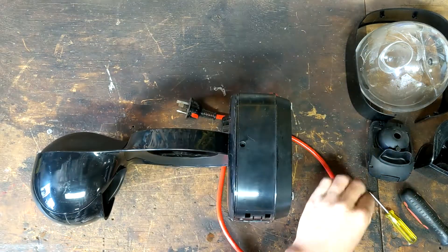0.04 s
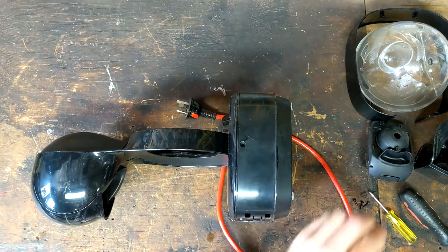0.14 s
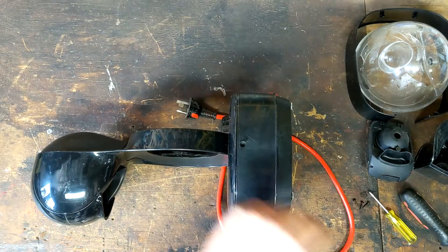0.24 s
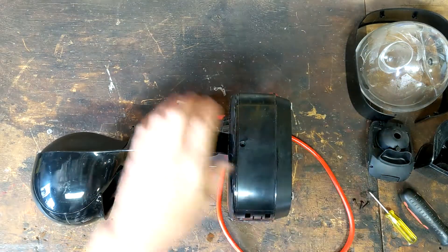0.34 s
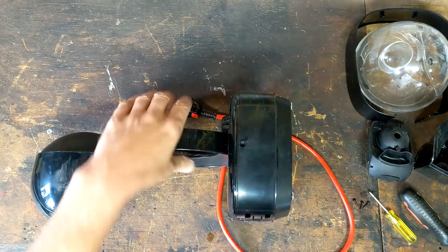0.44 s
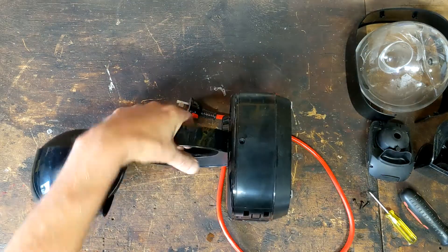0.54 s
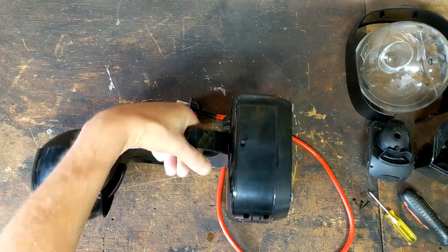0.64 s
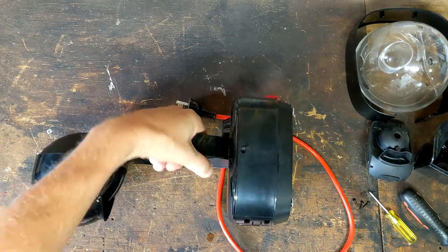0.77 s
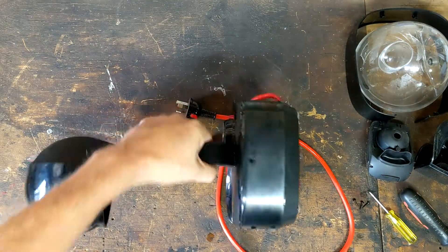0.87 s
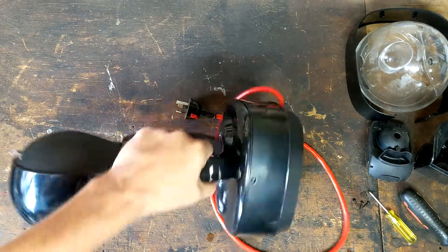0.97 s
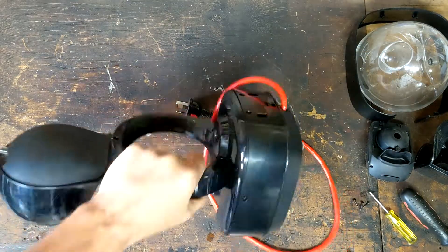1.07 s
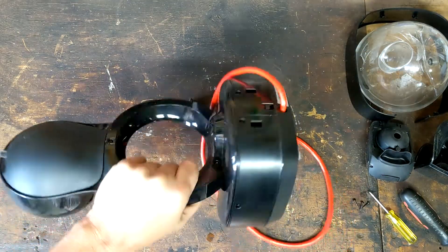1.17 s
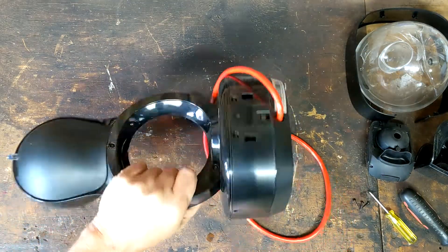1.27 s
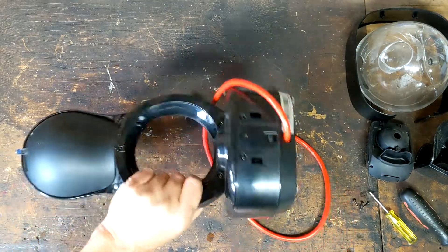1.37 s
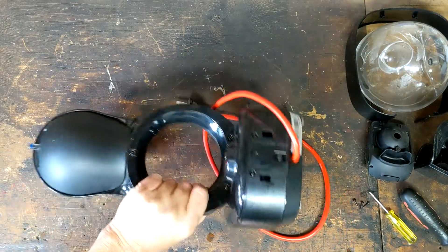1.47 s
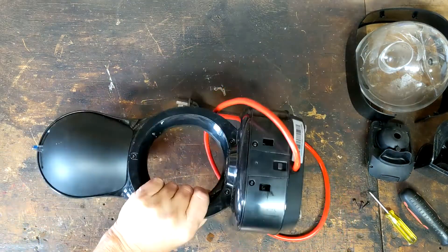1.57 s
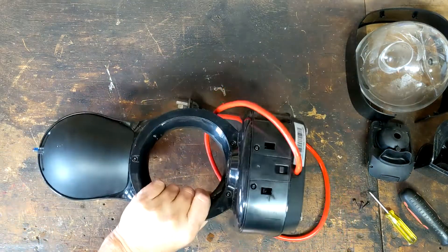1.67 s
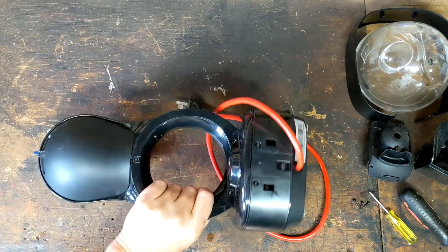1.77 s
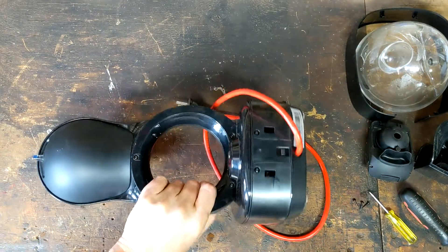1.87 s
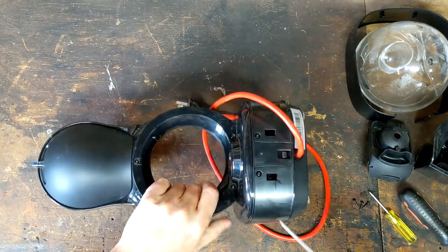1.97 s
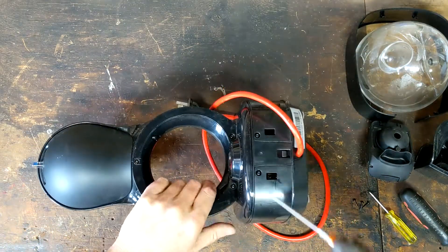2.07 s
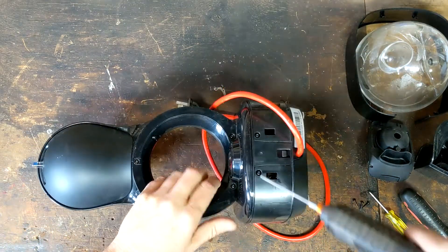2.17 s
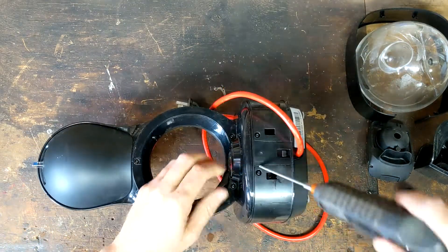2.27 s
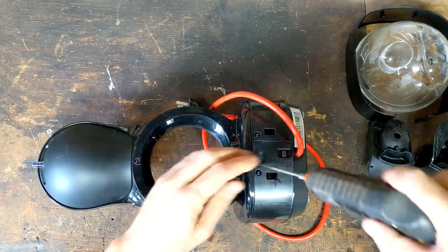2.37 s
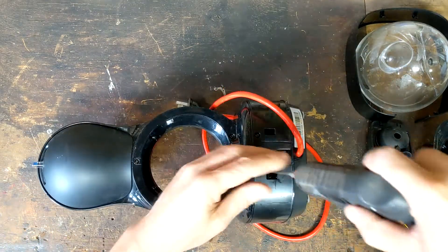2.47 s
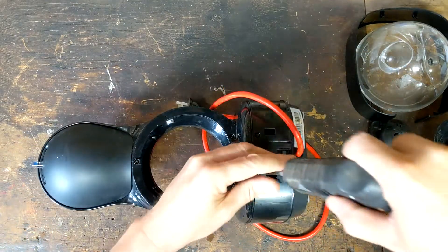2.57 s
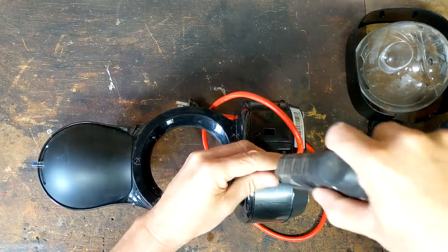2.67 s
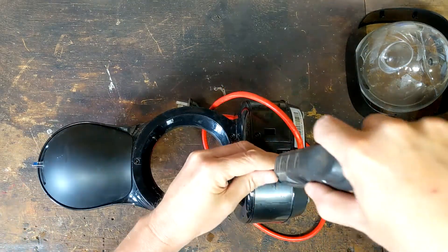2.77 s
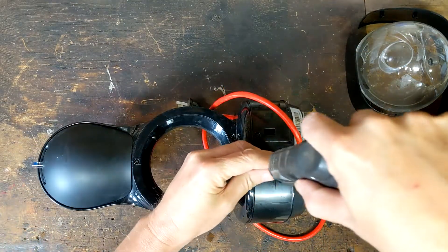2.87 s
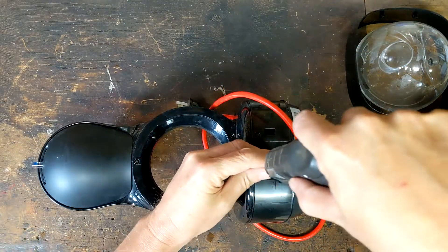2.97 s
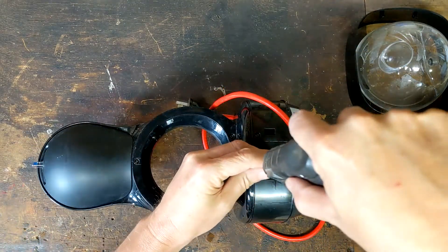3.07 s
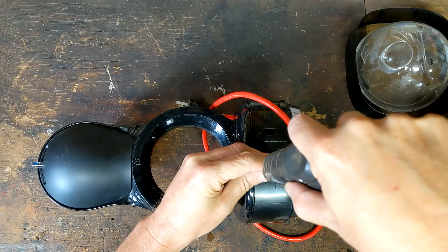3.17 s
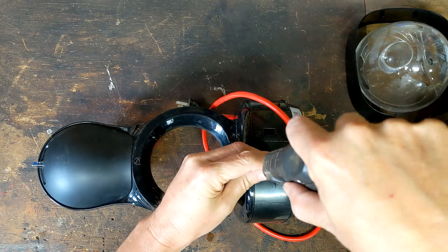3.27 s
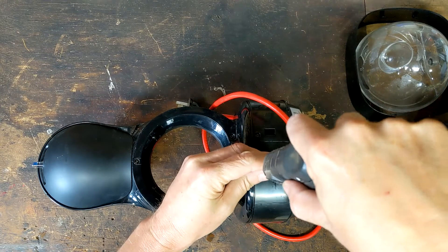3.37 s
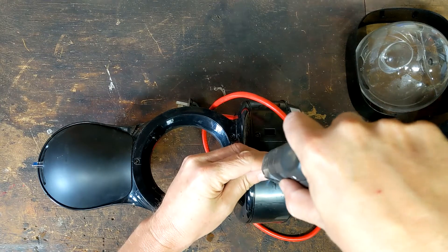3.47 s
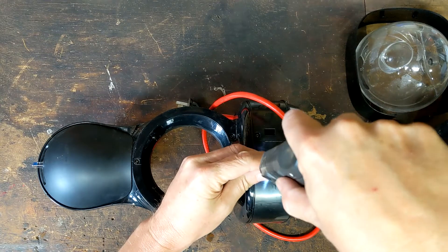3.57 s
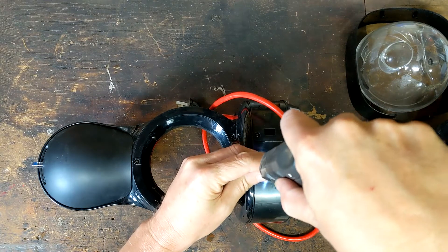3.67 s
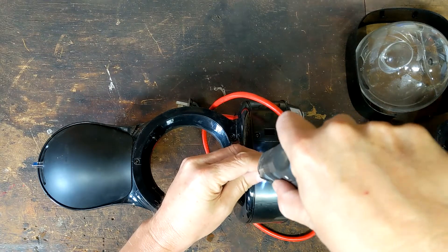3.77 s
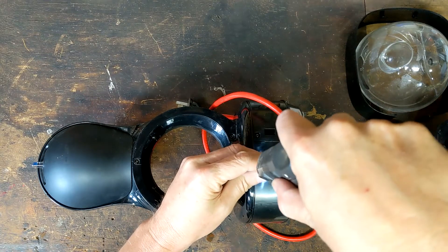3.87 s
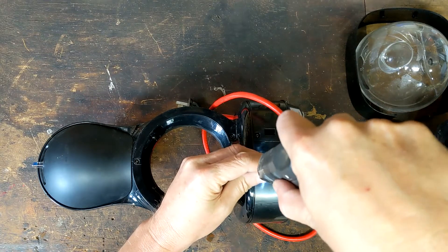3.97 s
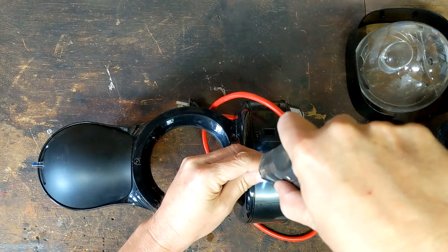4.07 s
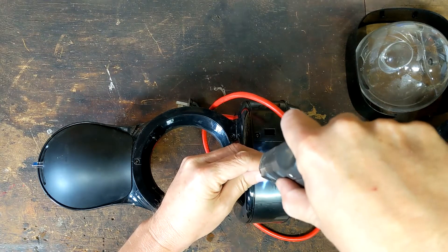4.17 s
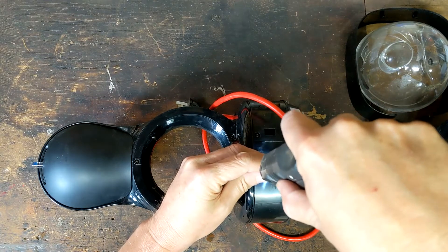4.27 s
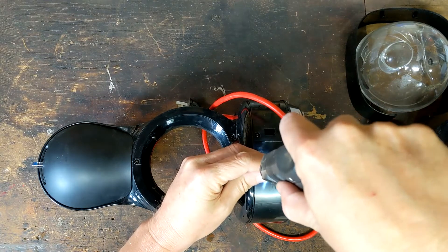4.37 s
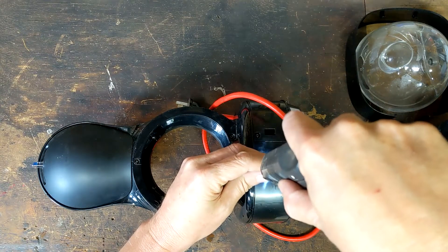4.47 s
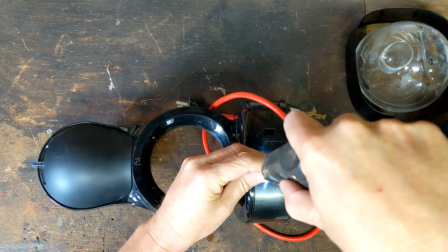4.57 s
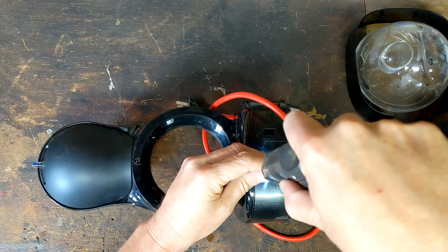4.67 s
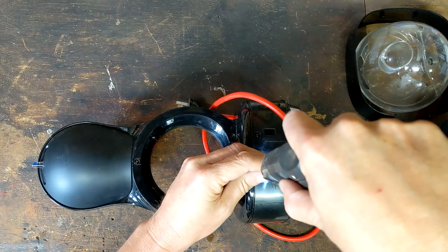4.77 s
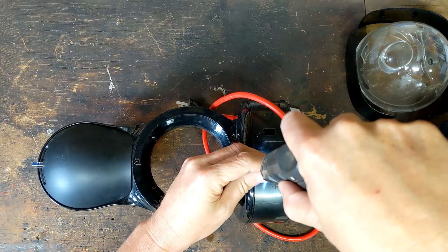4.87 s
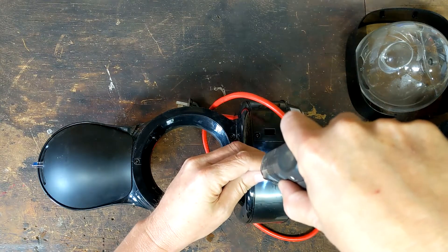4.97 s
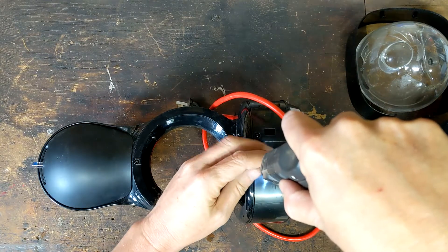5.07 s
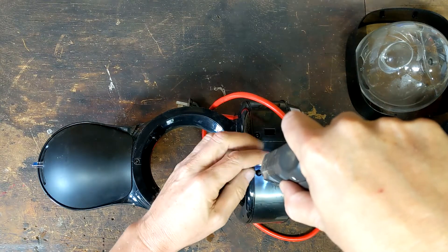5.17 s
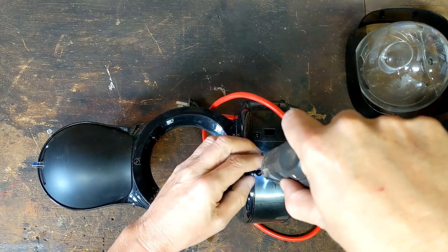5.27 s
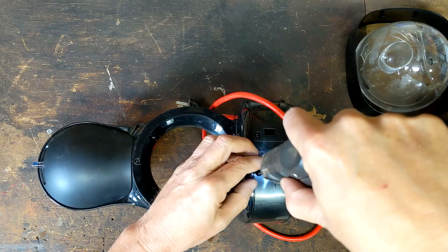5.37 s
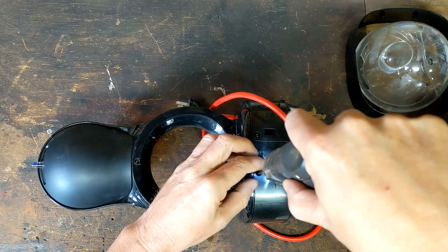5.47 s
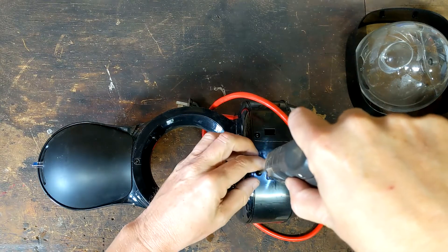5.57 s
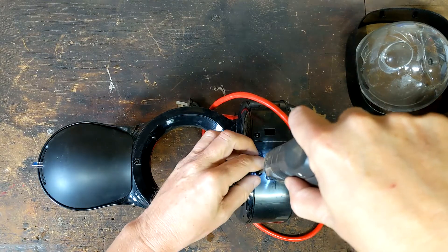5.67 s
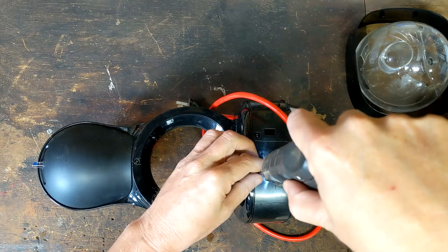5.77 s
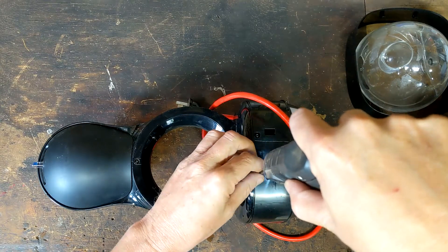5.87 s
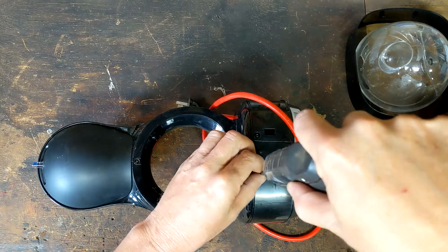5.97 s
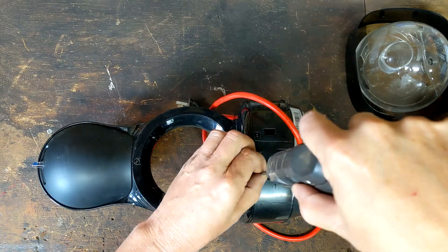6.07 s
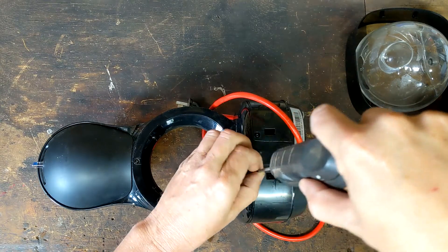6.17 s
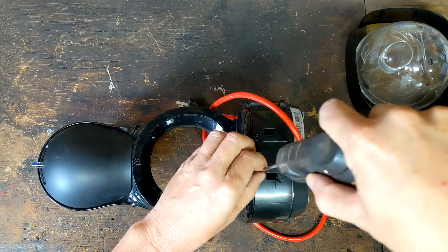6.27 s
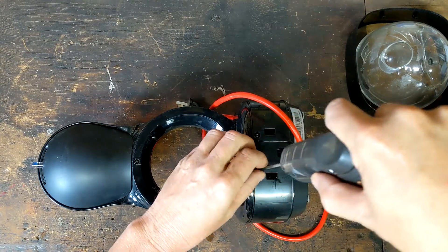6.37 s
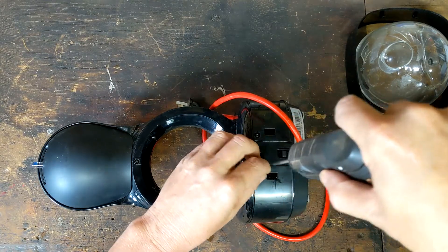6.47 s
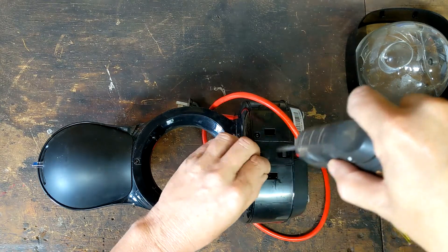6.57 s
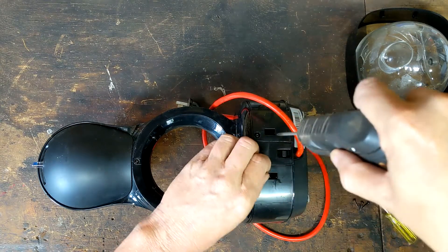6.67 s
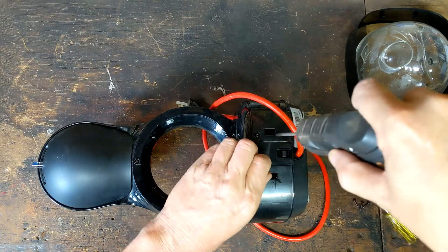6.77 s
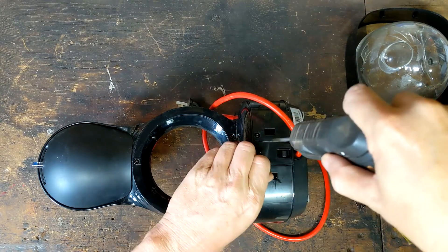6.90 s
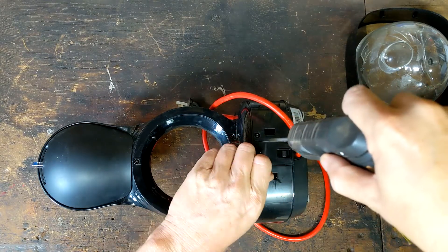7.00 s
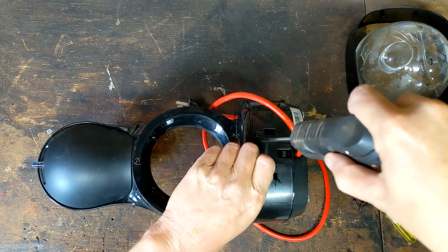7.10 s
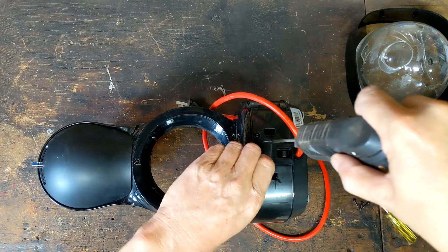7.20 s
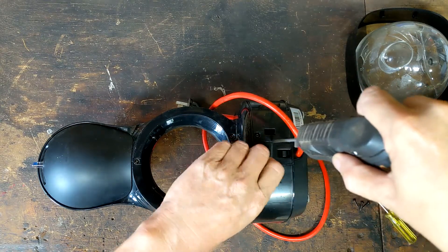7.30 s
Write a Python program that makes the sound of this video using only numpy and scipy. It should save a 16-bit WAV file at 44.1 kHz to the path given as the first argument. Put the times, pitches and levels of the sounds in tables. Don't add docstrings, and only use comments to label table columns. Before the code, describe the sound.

A plastic housing thuds onto a wooden bench, a tool bit ticks at a screw, then a small geared motor whines, rattles and coasts down.

```python
import sys
import numpy as np
from scipy import signal
from scipy.fft import rfft, irfft, next_fast_len
from scipy.io import wavfile
from scipy.ndimage import uniform_filter1d

SR = 44100
rng = np.random.default_rng(int(sys.argv[2]) if len(sys.argv) > 2 else 0)


def volts_from_decibels(level):
    exponent = np.asarray(level, float) / 20
    return 10 ** exponent


def materialize(psi):
    bounded = np.clip(np.atleast_2d(psi).T, -1, 1)
    quanta = np.round(bounded * 32767).astype(np.int16)
    wavfile.write(sys.argv[1], SR, quanta)


N = 323694

# pitch_hz, level_db (per Hz)
CASING_COLOUR = [(120, -52), (200, 0), (500, -16), (749, -8.5), (933, -4.5), (1060, -7.5), (1650, -11.5),
                 (2420, -15), (3560, -9.5), (4950, -18.5), (5630, -18), (8270, -21), (9060, -19.5),
                 (13600, -29), (16000, -25)]
TRIGGER_S, RELEASE_S, MESH_HZ = 3.61, 5.95, 917


def evened(x):
    return x / np.sqrt(np.mean(x ** 2) + 1e-20)


def hiss():
    return rng.standard_normal((2, N))


def read(points, hz):
    f, value = np.transpose(points)
    return np.interp(np.log(hz + 1), np.log(f + 1), value)


def band(x, lo_hz, hi_hz, order=2):
    sos = signal.butter(order, [lo_hz, min(hi_hz, 20000)], "bandpass", fs=SR, output="sos")
    return signal.sosfilt(sos, x, axis=-1)


def colour(x, gain):
    size = next_fast_len(x.shape[-1])
    spectrum = rfft(x, size) * gain(np.fft.rfftfreq(size, 1 / SR))
    return irfft(spectrum, size)[..., :x.shape[-1]]


def drift(seconds):
    size = round(seconds * SR)
    return evened(uniform_filter1d(uniform_filter1d(rng.standard_normal(N), size), size))


def bumps(modes, hz):
    return volts_from_decibels(sum(db / (1 + (2 * (hz - f) / width) ** 2) for f, width, db in modes))


def ringing(modes, t):
    return sum(volts_from_decibels(db - 60 * t / t60) * np.sin(2 * np.pi * hz * t) for hz, db, t60 in modes)[None]


def air():
    # pitch_hz, level_db (per Hz)
    hush_colour = [(110, -10), (180, -8), (341, -2.5), (435, -6), (670, -11), (888, -9), (2110, -18.5),
                   (4720, -18), (5700, -21), (6620, -21), (9640, -20.5), (15100, -30), (16000, -19)]
    # pitch_hz, width_hz (or waver), level_db
    hum_lines = [
        (99.5, 14, -67),
        (347, 1.5, -70),
    ]
    hush = evened(colour(hiss(), lambda hz: volts_from_decibels(read(hush_colour, hz))))
    (low_hz, width_hz, low_db), (thin_hz, waver_hz, thin_db) = hum_lines
    hum = volts_from_decibels(low_db) * evened(band(hiss(), low_hz - width_hz / 2, low_hz + width_hz / 2))
    thin = np.sin(2 * np.pi * np.cumsum(thin_hz + waver_hz * drift(0.23)) / SR)
    return volts_from_decibels(-64.5 + 0.88 * drift(0.024)) * hush + hum + volts_from_decibels(thin_db + 1 + drift(0.039)) * thin


def bird():
    # start_s, level_db
    calls = [
        (.138, -73),
        (.33, -70),
        (.538, -68),
        (3.1, -72),
        (3.335, -69),
    ]
    # time_s, pitch_hz, level_db
    glide = [
        (0, 2980, -5),
        (.016, 3330, -1),
        (.034, 3050, -5),
        (.042, 3150, -14),
        (.062, 3300, -12),
        (.072, 3330, 0),
        (.098, 2850, -7),
    ]
    out, (s, hz, db) = np.zeros(N), np.transpose(glide)
    t = np.arange(0, s[-1], 1 / SR)
    whistle = np.sin(2 * np.pi * np.cumsum(np.interp(t, s, hz)) / SR)
    chirp = whistle * volts_from_decibels(np.interp(t, s, db)) * signal.windows.tukey(len(t), .15)
    for start_s, level_db in calls:
        flutter_db = 3 * evened(uniform_filter1d(rng.standard_normal(len(t)), 200))
        out[round(start_s * SR):][:len(t)] += volts_from_decibels(level_db + flutter_db) * chirp
    return out


def gusts():
    # peak_s, level_db, fall_db_per_s
    swells = [(.02, -70, 30), (.3, -64, 4), (.99, -50, 60), (1.74, -40, 92), (2.01, -47.5, 28),
              (2.5, -62.5, 2), (3.5, -53, 30), (4.93, -67, 31), (5.89, -54.5, 12), (6.258, -41, 22),
              (6.486, -40.5, 50), (6.76, -48, 25), (7.3, -59, 100)]
    # start_s, level_db, length_s
    puffs = [(3.524, -38, 0.015), (3.543, -41, 0.01), (5.909, -62, 0.0092), (6.25, -34, 0.0088),
             (6.31, -36, 0.0077), (6.37, -40, 0.0086), (6.404, -47, 0.013), (6.481, -52, 0.012),
             (6.508, -47, 0.01), (6.606, -49, 0.012), (6.753, -56, 0.012), (6.829, -41, 0.015),
             (6.888, -36.5, 0.01), (6.973, -44, 0.0096), (7.02, -49, 0.011), (7.297, -41.5, 0.0098)]
    calm_db, rise_db_per_s = -72, 200
    t = np.arange(N) / SR
    level_db = np.max([db - np.maximum(rise_db_per_s * (s - t), fall * (t - s)) for s, db, fall in swells], 0)
    level_db = np.maximum(level_db, calm_db) - 6.5 + 1.8 * drift(0.0096)
    out = volts_from_decibels(level_db) * evened(band(hiss(), 19.7, 78))
    for start_s, db, length_s in puffs:
        u = np.arange(-1.5 * length_s, 4 * length_s, 1 / SR) / length_s
        push = -u * np.exp(-2.2 * u ** 2) * 1.25 + np.exp(-np.abs(u) * 5.6)
        part = out[0, round(start_s * SR):][:len(u)]
        part += volts_from_decibels(db - 1.5) * push[:len(part)]
    return out


def blows(rows, modes, rise_s, click, wide_db, top_hz):
    # pitch_hz, level_db, t60_s
    boom_modes = [(65.4, -1.5, 0.42), (97, -1, 0.18), (147.4, 3.5, 0.11), (181.5, -0.5, 0.095),
                  (265, -4, 0.08), (323, -9, 0.12)]
    lead_in_s = .014
    damping = .24
    spot_db_per_octave = -4
    out, t = np.zeros((2, N + SR)), np.arange(SR // 2) / SR
    boom = ringing(boom_modes, t)
    since = np.maximum(t - lead_in_s, 0)
    swell = volts_from_decibels(-19) * t / lead_in_s * (t < lead_in_s) + 1 - np.exp(-since / rise_s)
    for start_s, db, bass_db, treble_db, t60, spot_hz in rows:
        draw, detune = rng.standard_normal((3, len(t))), rng.uniform(.98, 1.02, len(modes))
        grains_db = 4 * evened(uniform_filter1d(draw[2], 70))
        chatter = draw[:2] * volts_from_decibels(5.7 * np.abs(draw[2]) + grains_db - 60 * since / t60) * swell
        chatter[:, round((lead_in_s + .0015) * SR)] -= click
        struck = []
        for (hz, mode_db, mode_t60), shift in zip(modes, detune):
            if hz > 250:
                spot_db = spot_db_per_octave * abs(np.log2(hz / spot_hz))
                held_t60 = min(mode_t60, .9) * damping * (450 / hz) ** .5
                struck.append((hz * shift, mode_db + spot_db, held_t60))
        mid = evened(signal.fftconvolve(chatter, ringing(struck, t), axes=1)[:, :len(t)])
        mid += volts_from_decibels(wide_db) * evened(band(chatter, 400, 2700))
        mid += volts_from_decibels(-3.0) * evened(band(chatter, 0.89 * spot_hz, 0.99 * spot_hz, order=1))
        low = evened(signal.fftconvolve(chatter, boom, axes=1)[:, :len(t)])
        low += volts_from_decibels(3.5) * evened(band(chatter, 56, 463))
        crack = band(chatter, 1250, top_hz)
        parts = (mid, 0), (low, bass_db + 6.5), (crack, treble_db + 0.5)
        at = round((start_s - lead_in_s) * SR)
        blow = sum(volts_from_decibels(d) * p / np.sqrt(np.mean(p[:, 600:1500] ** 2)) for p, d in parts)
        out[:, at:at + len(t)] += volts_from_decibels(db - 11) * blow
    return out[:, :N]


def bench_knocks():
    # start_s, level_db, bass_db (relative), treble_db (relative), rattle_t60_s
    knocks = [(0.635, -46, -4, -6.5, 0.14), (0.758, -61.5, 2.5, 3, 0.21), (0.971, -31.5, -3, -19, 0.13),
              (1.074, -55.5, 2, -1, 0.1), (1.112, -52, -4, -30, 0.24), (1.182, -56, 3, -16, 0.28),
              (1.534, -49, -2.5, -9, 0.046), (1.621, -16, 2, -12.5, 0.16), (1.632, -15, -6, -17, 0.074),
              (1.654, -25, -11, -7, 0.19), (1.753, -36.5, 4, -38, 0.2), (1.774, -31, -7.5, -33, 0.045),
              (1.877, -57.5, 9.5, -29, 0.16), (1.989, -33, 6.5, -21, 0.14), (2.06, -52.5, 6.5, -18, 0.27),
              (2.153, -51, 8, -5, 0.12), (3.09, -59, 14, -24, 0.053), (3.262, -37, -11, -10, 0.058),
              (3.529, -58, 4, -20, 0.097)]
    # pitch_hz, level_db, t60_s
    wood = [(285, 7, 0.084), (414, 5.5, 0.28), (570, -5, 0.36), (637, 1, 0.28), (853, -2, .2),
            (940, 5, 0.14), (1144, -8, 0.46), (1440, 3, 0.16), (1490, -8.5, 0.16), (1690, 7.5, 0.23),
            (2070, -42, 0.2), (2440, -18, 0.15)]
    spot_hz = 760
    return blows([(*row, spot_hz) for row in knocks], wood, 0.0013, 10.4, 3.1, 8800)


def bit_taps():
    # start_s, level_db, bass_db (relative), treble_db (relative), spot_hz
    tap_rows = [(0.121, -45.5, -41, 1.5, 2400), (0.143, -47, -32, -5, 2460), (1.007, -53.5, -5, 6.5, 1480),
                (1.361, -52.5, -17, -5, 970), (2.094, -44.5, -1, -28, 1120), (2.115, -53, 3, -25, 1430),
                (2.358, -37.5, -13, -37, 540), (2.423, -51, 0, -4, 880), (2.451, -54.5, -3, 2.5, 1440),
                (2.478, -52.5, -15, -18, 1360), (2.836, -33, -42, -12, 600), (2.879, -48, -27, -1, 1160),
                (2.897, -44, -27, -13, 2330), (3.006, -31, -44, -14.5, 520), (3.067, -44, -2, -21, 1830),
                (3.077, -40, -29, -30, 1170), (3.23, -50.5, -4, -19, 950), (3.262, -41, -1, -6.5, 1740),
                (3.625, -49, -9, -11, 850), (6.696, -31, -42, -10, 1170), (6.709, -36.5, -24, 0.5, 1830),
                (6.768, -62, -4, 4, 1100), (7.232, -56.5, -4, -15, 937)]
    # pitch_hz, level_db, t60_s
    shell = [(447, 1.5, 0.52), (600, -7, 0.26), (950, -4, 0.14), (1166, -3.5, 0.48), (1440, 7.5, 0.055),
             (1790, -4, 0.3), (2600, -12, 0.16), (2970, -15.5, 0.15), (3580, 4, 0.11), (3930, -4, 0.15),
             (4300, -34, 0.15)]
    t60_s = .055
    rows = [(s, db, bass_db, treble_db, t60_s, spot_hz) for s, db, bass_db, treble_db, spot_hz in tap_rows]
    return blows(rows, shell, 0.0019, 4.1, -8.5, 5300)


def speed():
    spin_up_s, creep_hz_per_s = .066, 10
    brake_hz_per_s, ease_hz_per_s2 = 1850, 450
    on, off = np.maximum(np.arange(N) / SR - [[TRIGGER_S], [RELEASE_S]], 0)
    driven = (MESH_HZ + creep_hz_per_s * on) * (1 - np.exp(-on / spin_up_s))
    return np.maximum(driven - brake_hz_per_s * off + ease_hz_per_s2 * off ** 2, 0)


def casing(hz):
    # pitch_hz, width_hz, level_db
    rings = [(826, 47, 1), (1444, 27, 6), (3220, 200, 1), (3475, 16, 6.5), (3710, 30, 4.5),
             (3935, 10, 12.5), (4030, 23, 8), (4510, 60, 1), (5370, 90, 4.5), (5790, 110, 9),
             (5370, 2300, 6.5), (6650, 73, -11), (7380, 130, 4.5), (9360, 84, 1), (10400, 430, 11),
             (10340, 70, -10), (12100, 150, 13), (13380, 580, 14)]
    return volts_from_decibels(read(CASING_COLOUR, hz)) * bumps(rings, hz)


def whine(t, on, mesh, turns):
    # multiple of the mesh, level_db (at the casing peak)
    overtones = [(2, -64), (3, -61), (4, -68), (5, -67), (6, -67), (7, -70)]
    let_go_s, let_go_length_s = 6.03, .05
    groan_s, groan_rise_s, groan_hold_s = 3.66, 0.072, 0.57
    level_db = -46 + 24 * np.log10(mesh / MESH_HZ + 1e-3)
    level_db += -3.5 * np.sin(np.pi * np.minimum(on / (RELEASE_S - TRIGGER_S), 1)) ** 2
    level_db += -11 * np.clip((t - let_go_s) / let_go_length_s, 0, 1)
    groan_db = -59 - 85 * np.maximum(t - groan_s - groan_hold_s, 0)
    groan_db += 20 * np.log10(np.clip((t - groan_s) / groan_rise_s, 1e-4, 1))
    tone = np.exp(2j * np.pi * turns)
    out = volts_from_decibels(level_db + 3 * drift(.006)) * np.sqrt(2) * tone
    slack_db = np.interp(t, [5.95, 6.15, 6.36, 6.54], [0, 10, 9, 3])
    for k, db in overtones:
        flare = bumps([(920, 420, 12), (500, 400, -14), (2300, 900, -5)], k * mesh) / volts_from_decibels(9)
        out += volts_from_decibels(db + slack_db + 3 * drift(.02)) * flare * tone ** k
    groan = volts_from_decibels(groan_db) * evened(band(hiss(), 1760, 1780))
    return (np.array([out.real, out.imag]) + groan) * (mesh > 0)


def gear_rattle(t, on, mesh, turns):
    settle_s, kick_s = 0.039, 0.11
    smooth = 1 / (settle_s * SR)
    lagging = np.where(t > RELEASE_S, signal.lfilter([smooth], [1, smooth - 1], mesh), mesh)
    lag = np.log10(lagging / MESH_HZ + 0.00052)
    run = np.minimum(on, RELEASE_S - TRIGGER_S)
    level_db = -42.5 + 19 * lag - 1.0 * run + 7.5 * np.exp(-on / kick_s)
    body_db, hiss_db = -7 - 4.5 * lag, -4.5 + 7.5 * lag + 0.86 * run
    throb = volts_from_decibels(0.49 * np.sin(2 * np.pi * turns / 31.0) + 0.23 * drift(0.014) + .5 * drift(0.038))
    z = signal.stft(hiss() * throb, SR, nperseg=512)[2]
    patches = uniform_filter1d(rng.standard_normal(z.shape[1:]), 5, 0)
    patches = evened(uniform_filter1d(patches, 16, 1))
    streaks = evened(uniform_filter1d(rng.standard_normal(z.shape[1:]), 70, 1))
    raw = signal.istft(z * volts_from_decibels(0.78 * patches + 1.23 * streaks), SR, nperseg=512)[1][:, :N]
    sharp = np.interp(t, [5.2, 5.9, 6.2], [1, .7, .15])
    blurred = colour(raw, lambda hz: casing(hz) ** .5 * volts_from_decibels(read(CASING_COLOUR, hz) / 2))
    noise = sharp * colour(raw, casing) + (1 - sharp) * 1.26 * blurred
    out = evened(band(noise, 2530, 6930, order=4))
    out += volts_from_decibels(body_db) * evened(band(noise, 347, 2390, order=4))
    out += volts_from_decibels(hiss_db) * evened(band(noise, 7780, 16400, order=4))
    bench_shake = evened(band(hiss(), 102, 450)) * (mesh / 930) ** 2
    out += volts_from_decibels(-20.5 + 2.0 * drift(0.011)) * bench_shake
    return out * volts_from_decibels(level_db)


def motor():
    t, mesh = np.arange(N) / SR, speed()
    on = np.maximum(t - TRIGGER_S, 0)
    turns = np.cumsum(mesh * (1 + 0.0032 * drift(0.0114))) / SR
    return (whine(t, on, mesh, turns) + gear_rattle(t, on, mesh, turns)) * (t > TRIGGER_S)


def tail(t60, start_s):
    t = np.arange(SR // 2) / SR
    bright = rng.standard_normal((2, len(t))) * (t > start_s)
    dull = band(bright, 65, 6700, order=1)
    echoes = dull * volts_from_decibels(-60 * t / t60) + 0.34 * (bright - dull) * volts_from_decibels(-60 * t / (2.0 * t60))
    return echoes / np.linalg.norm(echoes[0])


def ports(x):
    # pitch_hz, left-right likeness (0 to 1)
    likeness = [(60, 0.97), (130, 1), (250, 0.81), (500, 0.77), (1000, 0.58), (2000, 0.82), (4000, 0.28),
                (8000, 0.061), (15000, .1)]
    # pitch_hz, left minus right level_db
    shade = [(60, 0.5), (110, 3.5), (200, 1.5), (380, 5), (700, 5), (1290, 6), (2380, 6.5), (4400, 9.5),
             (8120, 10.5), (15000, 56)]
    # pitch_hz, phase the left port leads by (radians)
    lead = [(60, -0.36), (130, 1.24), (300, -2), (700, -1.4), (1460, 0.3), (2240, 1.5), (3900, 0.12)]
    same = lambda hz: np.clip(read(likeness, hz), 0, .995)
    right = colour(x[0], lambda hz: same(hz) * np.exp(-1j * read(lead, hz)))
    right += colour(x[1], lambda hz: np.sqrt(1 - same(hz) ** 2))
    left = colour(x[0], lambda hz: volts_from_decibels(3.0 + 0.038 * read(shade, hz)))
    return np.array([left, colour(right, lambda hz: volts_from_decibels(2.5 - 0.93 * read(shade, hz)))])


def scene():
    hits = bench_knocks() + bit_taps()
    room = volts_from_decibels(-11.0) * signal.fftconvolve(hits + bird(), tail(0.3, 0.0038), axes=1)[:, :N]
    return ports(air() + bird() + gusts() + hits + room + motor())


def roll_off(x):
    return signal.sosfilt(signal.butter(12, 16170, fs=SR, output="sos"), x)


def record(dry):
    # pitch_hz, width_hz, level_db
    cavity = [(5620, 320, 5.5), (8400, 92, -15.5), (9600, 550, 3), (11610, 260, 7), (13080, 630, 5)]
    edge_hz, ceiling = 15765, .6
    heard = ceiling * np.tanh(colour(dry, lambda hz: bumps(cavity, hz)) / ceiling)
    return roll_off(colour(heard, lambda hz: hz < edge_hz))


dry = scene()
out = record(dry)
materialize(out)
```